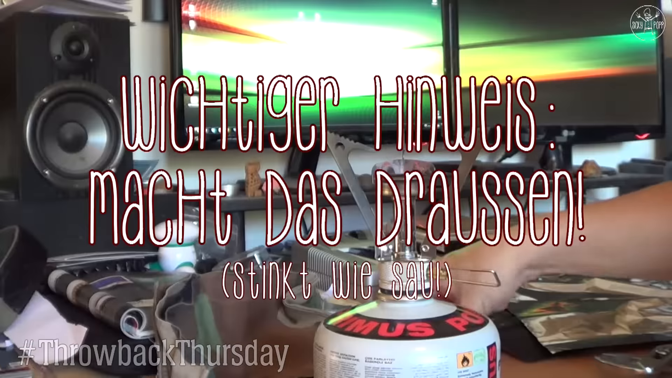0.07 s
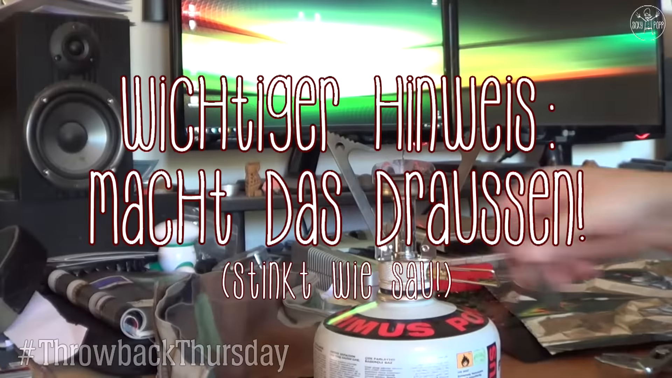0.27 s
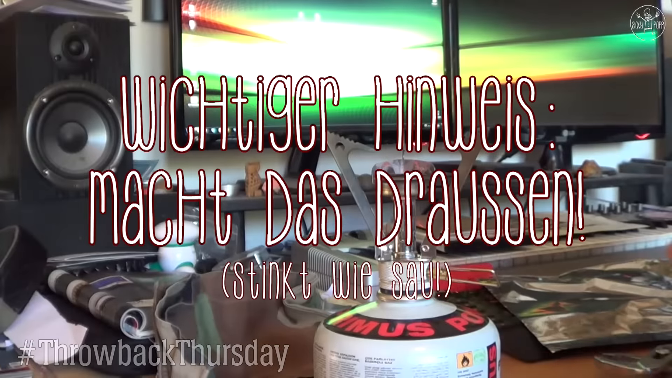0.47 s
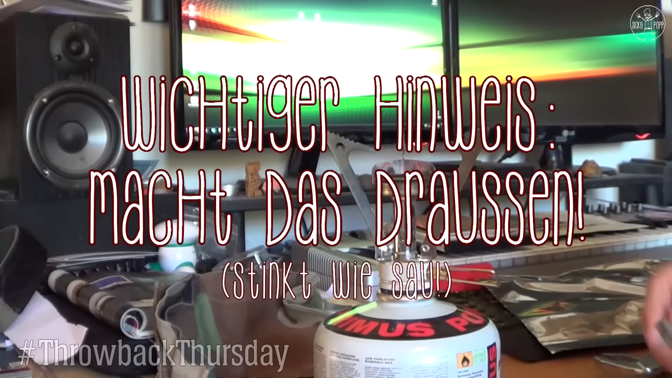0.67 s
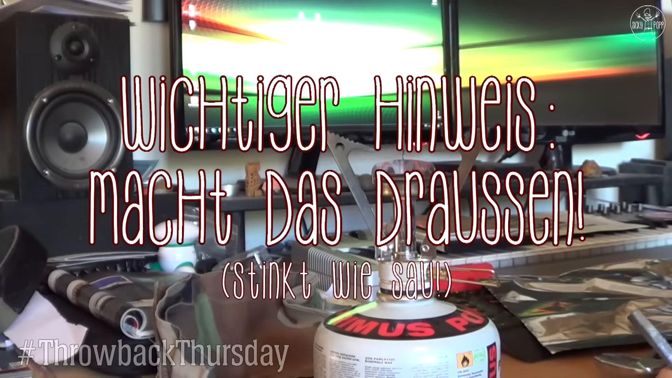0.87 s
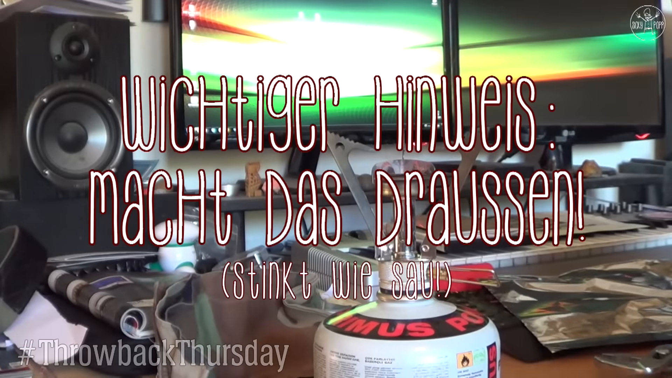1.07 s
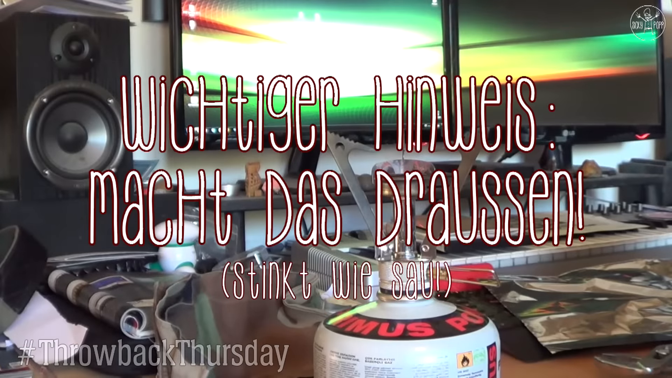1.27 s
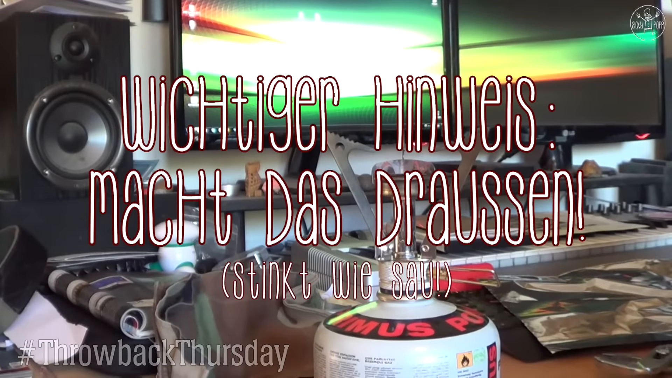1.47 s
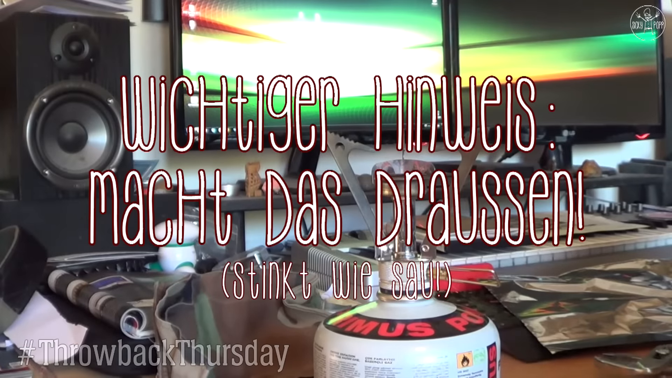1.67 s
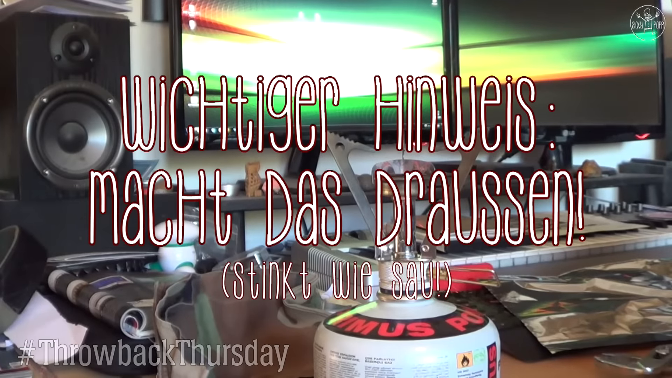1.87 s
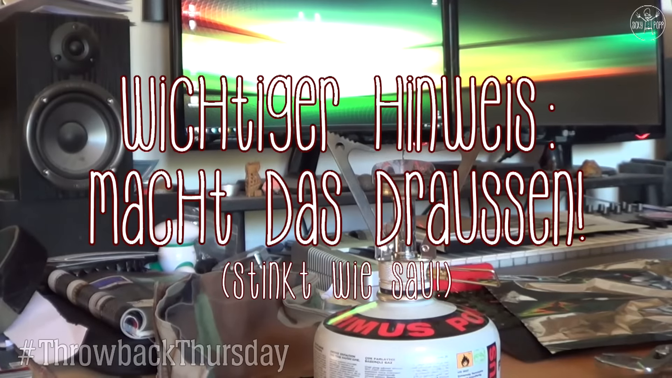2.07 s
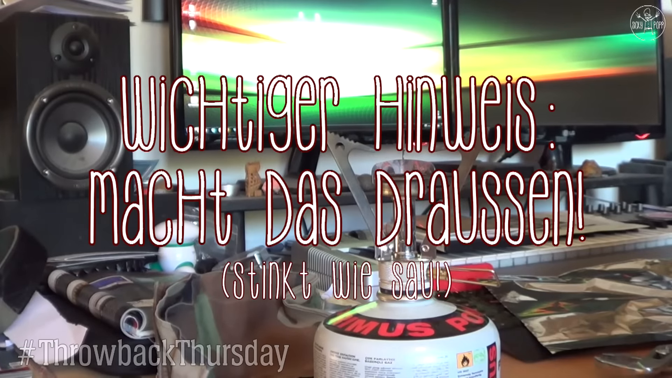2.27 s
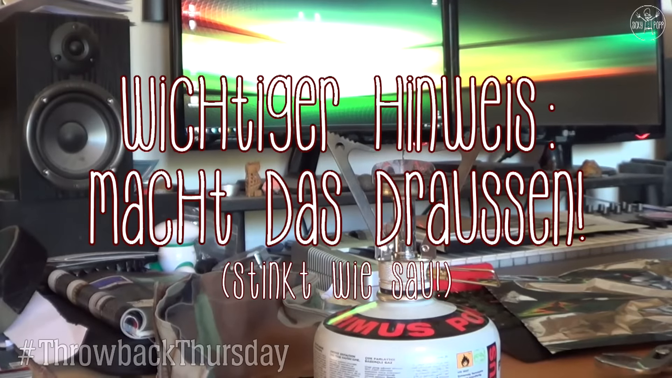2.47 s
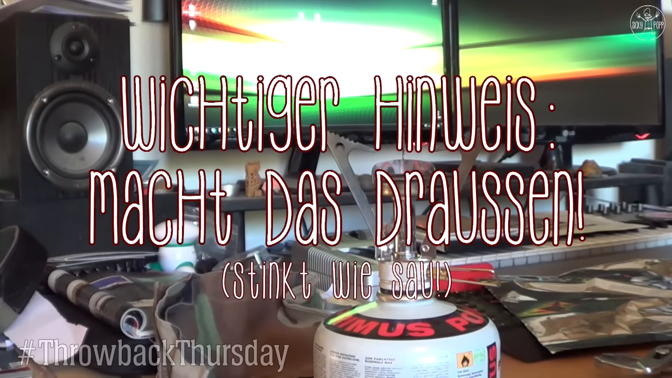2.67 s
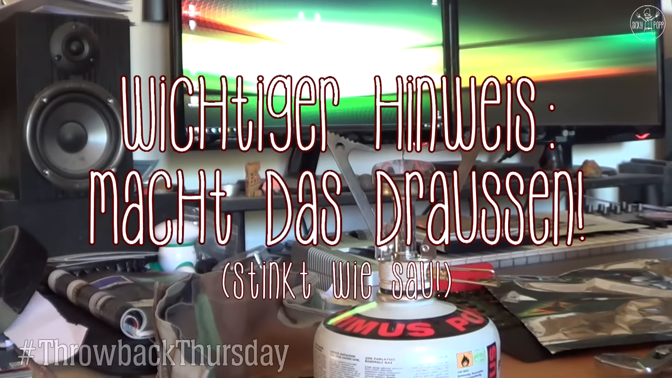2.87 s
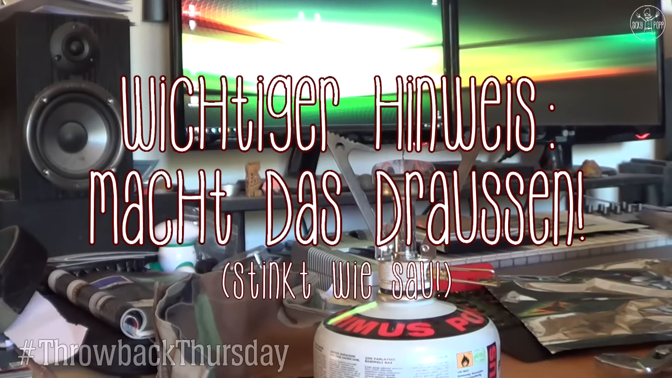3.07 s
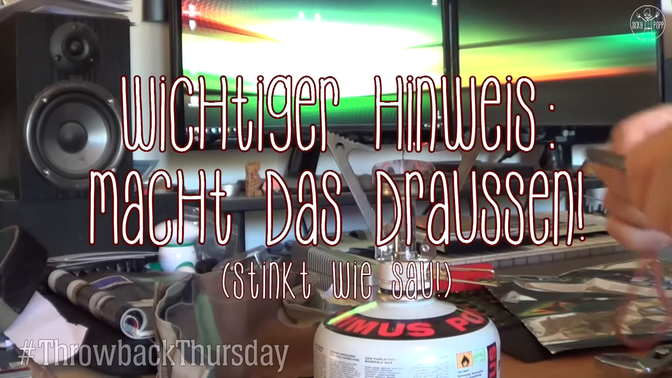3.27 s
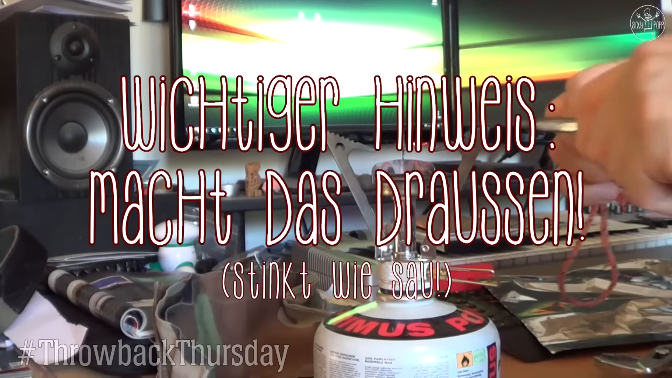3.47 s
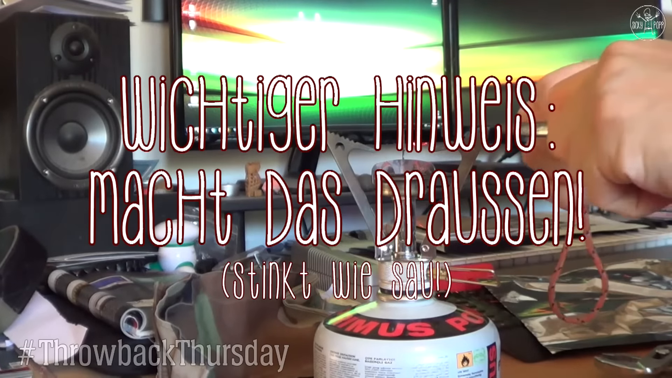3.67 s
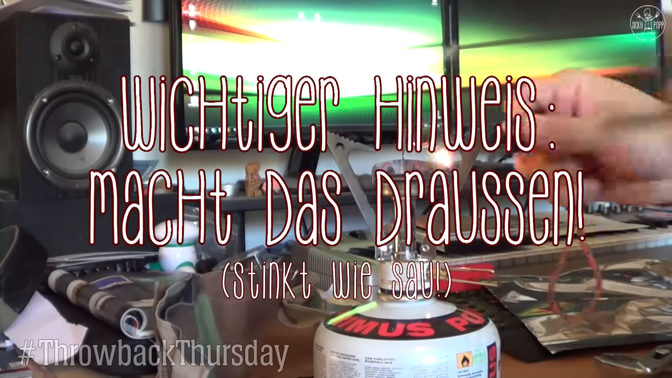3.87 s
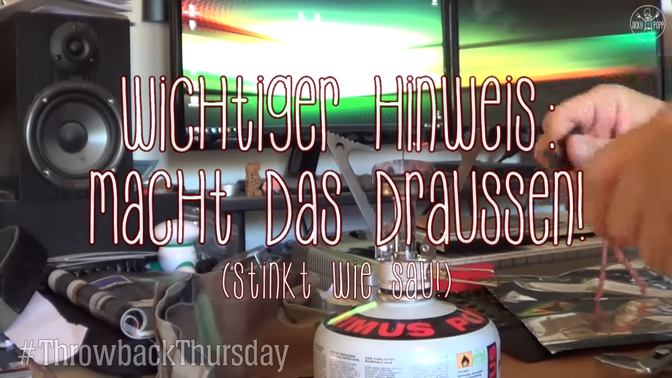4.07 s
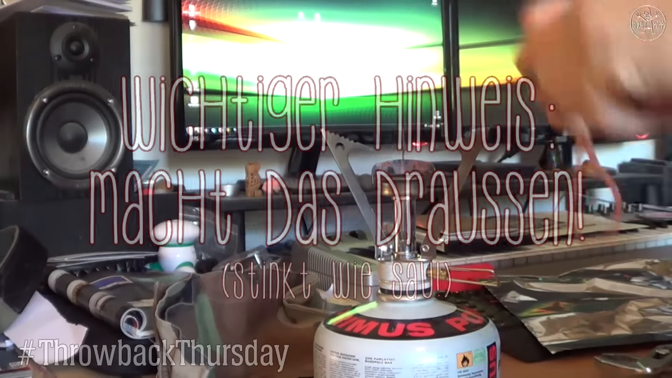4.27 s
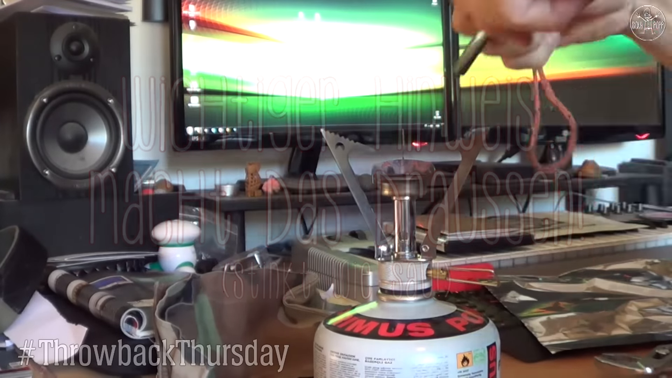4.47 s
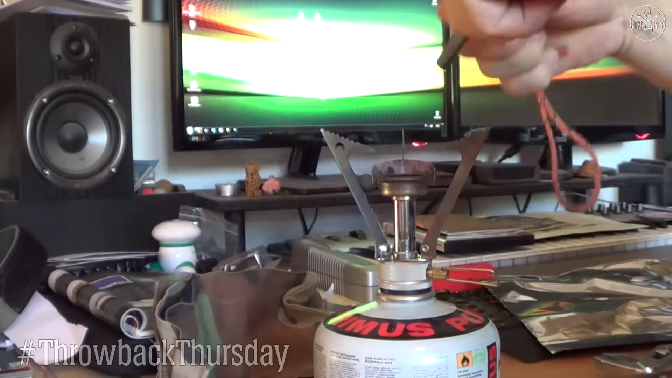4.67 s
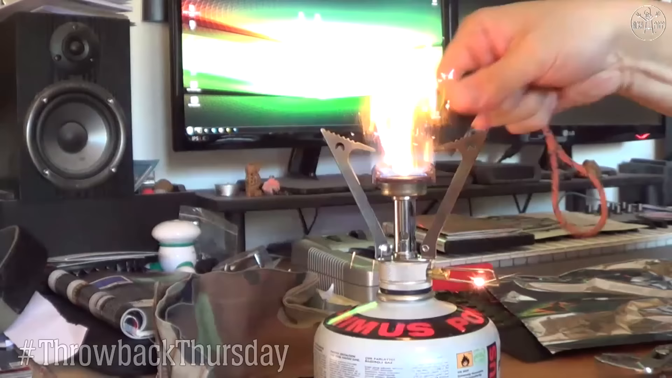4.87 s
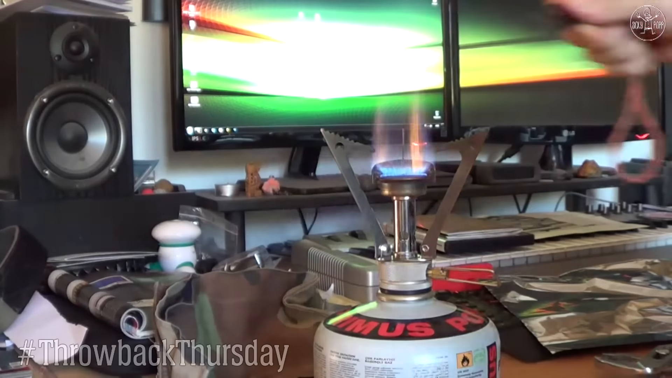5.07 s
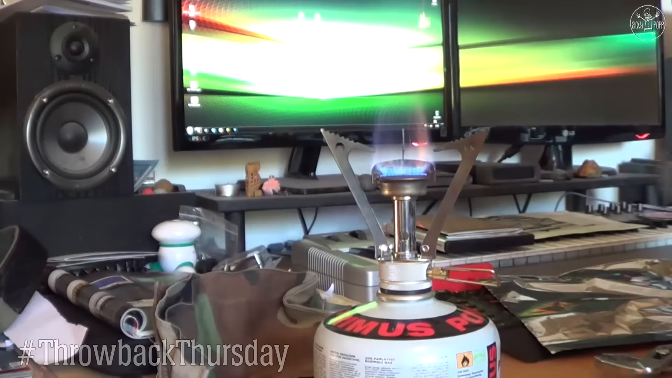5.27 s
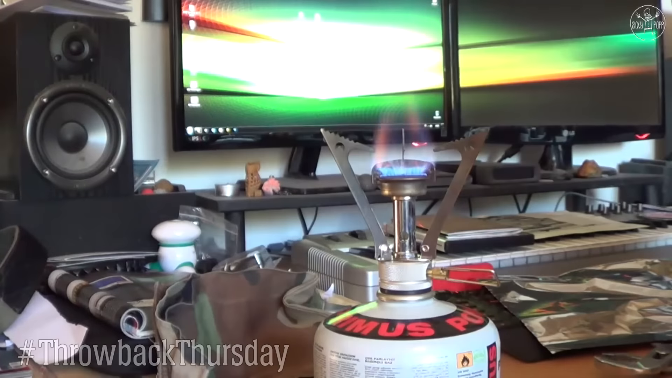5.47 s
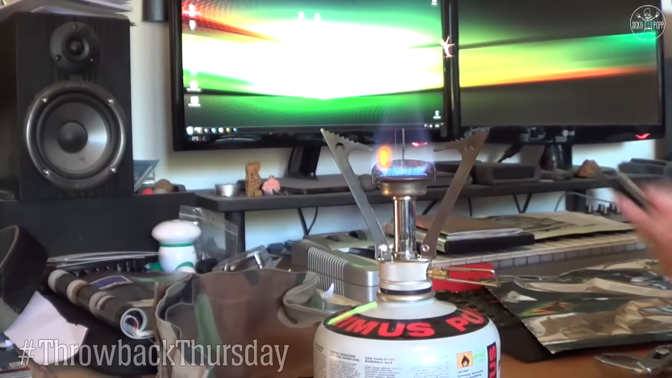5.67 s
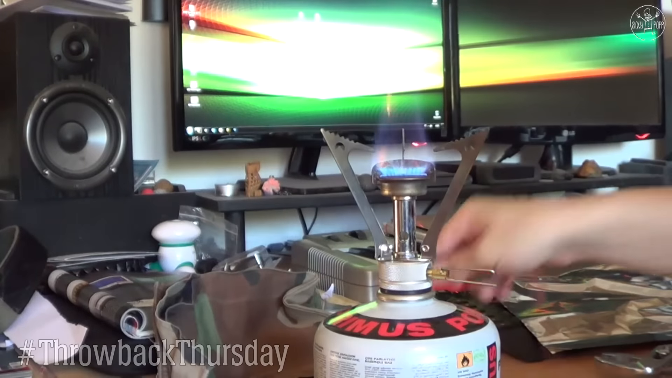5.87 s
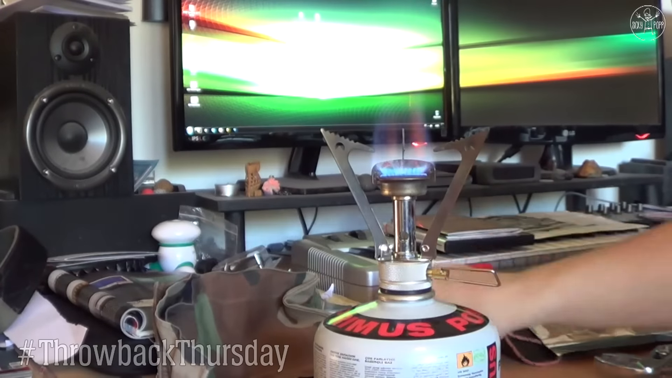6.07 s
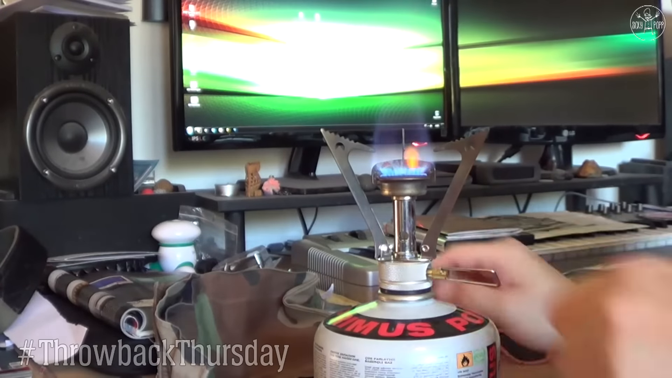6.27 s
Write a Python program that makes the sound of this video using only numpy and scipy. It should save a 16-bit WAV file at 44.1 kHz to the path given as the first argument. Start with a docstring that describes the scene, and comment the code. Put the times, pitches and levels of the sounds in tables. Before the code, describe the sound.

Metal clinks and rings, a fire steel taps and rasps, and a hissing gas burner catches and burns with a steady roar indoors.

```python
"""A desk in a small room, with a camping gas stove on it. Unlit gas hisses from the open valve while a
steel piece is dragged, clinked and set down: friction and impacts excite its modes, and a grip damps them.
A fire steel is tapped and scraped, twice hard; the second shower of sparks lights the gas with a soft
whump. The flame roars on, and a hand rummages among the steel again. A limiter holds the peaks down."""
import sys
import numpy as np
from scipy import signal
from scipy.fft import rfft, irfft, next_fast_len
from scipy.io import wavfile
from scipy.ndimage import uniform_filter1d, minimum_filter1d, map_coordinates

SR = 44100
rng = np.random.default_rng(int(sys.argv[2]) if len(sys.argv) > 2 else 0)


def int16_out(signal):
    """Quantize to a 16-bit WAV file."""
    q = np.round(np.clip(np.atleast_2d(signal).T, -1, 1) * 32767)
    wavfile.write(sys.argv[1], SR, q.astype(np.int16))


N = 277874

# clinks and knocks of the steel piece, and one dull tap on the desk: start_s, click_db, knock_db, ring_db
CONTACTS = [(.016, -8, -31.5, -46), (.133, -29, -36.5, -31.5), (0.289, -7.5, -29, -35),
            (.31, -16, -38, -28), (.322, -13.5, -29, -20.5), (.465, -9.5, -30.5, -11), (.471, 6, -25, -14),
            (.488, -22, -29, -4.5), (.554, 3, -28, -18), (.612, -14, -34, -13), (.645, -3, -27.5, -22),
            (.676, -2, -27, -40), (.878, -30, -37.5, -70), (1.55, -17, -20.5, -32),
            (1.605, -16, -35.5, -29), (1.616, -7, -38, -19.5), (1.842, -2.5, -17, -17),
            (1.874, -6, -30, -20), (1.898, -9, -40, -19.5), (6.072, -10, -19, -19),
            (6.114, -20, -13.5, -31), (6.147, -28, -28, -9.5), (6.176, -10, -49, -8.5),
            (6.213, -5, -41, -14), (6.249, -3, -33, -16.5)]


def amp(db):
    """Amplitude ratio of a level in decibels."""
    return 10 ** (np.asarray(db) / 20)


def unit(x):
    """Normalisation to an rms of 1."""
    return x / np.sqrt(np.mean(x ** 2) + 1e-20)


def along(points, hz):
    """Interpolation of (frequency_hz, value) points on a logarithmic frequency axis."""
    knots_hz, values = np.transpose(points)
    return np.interp(np.log(hz + 1), np.log(knots_hz + 1), values)


def curve(rows):
    """Linear interpolation of (time_s, value) rows at every sample."""
    return np.interp(np.arange(N) / SR, *np.transpose(rows))


def wobble(rate_hz, size=N):
    """Smooth random modulation: a spline through Gaussian knots."""
    knots = rng.standard_normal(int(size * rate_hz / SR) + 4)
    return map_coordinates(knots, [np.arange(size) * rate_hz / SR])


def add(track, start_s, sound):
    """Superposition of a sound on the track."""
    part = track[max(round(start_s * SR), 0):][:len(sound)]
    part += sound[:len(part)]


def filtered(x, response):
    """Linear filtering: the spectrum is multiplied by a frequency response."""
    size = next_fast_len(x.shape[-1] + 8192)
    return irfft(rfft(x, size) * response(np.fft.rfftfreq(size, 1 / SR)), size)[..., :x.shape[-1]]


def body(force, spectrum, size=4096):
    """A body colours a force as a causal, minimum-phase filter of unit energy."""
    magnitude = amp(along(spectrum, np.fft.rfftfreq(size, 1 / SR)))
    cepstrum = irfft(np.log(magnitude))
    cepstrum[1:size // 2] *= 2
    cepstrum[size // 2 + 1:] = 0
    response = irfft(np.exp(rfft(cepstrum)))
    return signal.fftconvolve(force, response / np.linalg.norm(response))[:N]


def resonance(force, hz, width_hz):
    """A driven damped oscillator of unit energy: the narrower its band, the longer it rings."""
    response = np.exp((2j * hz - width_hz) * np.pi * np.arange(SR // 8) / SR).imag
    return signal.fftconvolve(force, response / np.linalg.norm(response))[:N]


def impact(t60_s, chatter_db, chatter_t60_s):
    """A contact force as exponentially decaying noise: a short crack over weaker, longer chatter."""
    t = np.arange(SR // 4) / SR
    return rng.standard_normal(len(t)) * (amp(-60 * t / t60_s) + amp(chatter_db - 60 * t / chatter_t60_s))


def stick_slip(rate_hz, spread_db, decay_s):
    """Stick-slip friction of rms 1: tiny bursts of uneven size at random times."""
    slips = (rng.random(N) < rate_hz / SR) * amp(spread_db * np.clip(rng.standard_normal(N), -2, 2))
    envelope = signal.lfilter([1], [1, -np.exp(-1 / (decay_s * SR))], slips)
    return unit(envelope * rng.standard_normal(N))


def diffuse(pair):
    """A diffuse field is partly coherent at two points; two independent signals are mixed to match."""
    # likeness of left and right: frequency_hz, coherence
    coherence = [(60, .94), (130, .88), (300, .76), (700, .52), (1400, .52), (3000, .68), (7000, .75),
                 (15000, .93)]
    angle = lambda hz: np.arccos(np.clip(along(coherence, hz), -1, 1)) / 2
    mid, side = filtered(pair, lambda hz: np.array([np.cos(angle(hz)), np.sin(angle(hz))]))
    return np.array([mid + side, mid - side])


def diffuse_noise(spectrum):
    """Stationary stereo noise of rms 1 with the given spectral shape."""
    white = diffuse(rng.standard_normal((2, N)))
    return unit(filtered(white, lambda hz: amp(along(spectrum, hz))))


def room(x, wet_db):
    """Reverberation: diffuse reflections follow the direct sound, each band dying at its own rate."""
    # reverberation time: frequency_hz, t60_s
    decay_times = [(100, 0.29), (500, 0.31), (2000, 0.28), (7000, 0.25), (15000, 0.15)]
    hz, t, bands = signal.stft(rng.standard_normal((2, SR // 2)), SR, nperseg=256)
    decay = amp(-60 * t / along(decay_times, hz)[:, None])
    tail = diffuse(signal.istft(bands * decay, SR, nperseg=256)[1])
    tail *= 1 - np.exp(-np.arange(tail.shape[1]) / SR / 0.00092)  # reflections build up
    reflections = signal.fftconvolve(np.atleast_2d(x), tail / np.linalg.norm(tail[0]), axes=1)
    return x + amp(wet_db) * reflections[:, :N]


def standing_waves(hz):
    """Frequency response of the room's modes, which ring on in the bass."""
    # room modes: centre_hz, width_hz
    modes = [(87, 10), (119, 10), (214, 14), (270, 14), (330, 20), (515, 26), (671, 26)]
    peaks = sum(1j * hz * width / (centre ** 2 - hz ** 2 + 1j * hz * width) for centre, width in modes)
    return 1 + 0.7 * peaks


def direction(hz):
    """Level and phase differences between the channels place the sound a little to the right."""
    # left minus right: frequency_hz, level_db
    level_difference = [(100, 0.1), (200, 0), (380, -1.5), (700, -5), (1300, -5.5), (2400, -4.5),
                        (4400, -2.5), (8000, -1.4), (15000, 0.2)]
    # lead of left over right: frequency_hz, phase_rad
    phase_difference = [(130, 0.07), (550, -0.66), (1700, -.25), (3800, .2), (8000, .2), (12000, -0.1)]
    left = amp(along(level_difference, hz) / 2) * np.exp(1j * along(phase_difference, hz) / 2)
    return np.array([left, 1 / left])


def room_tone():
    """The noise floor: faint low noise whose level drifts slightly."""
    # ambient spectrum: frequency_hz, density_db
    spectrum = [(20, -22), (35, -4), (60, -16), (110, -11), (170, -5.5), (330, -8.5), (550, -10.5),
                (1500, -17), (2500, -32)]
    return amp(-54 + 0.67 * wobble(2.9)) * diffuse_noise(spectrum)


def rustle(peak_s=2.675, width_s=0.22):
    """Soft low noise swells and fades under a Gaussian envelope."""
    # rustle spectrum: frequency_hz, density_db
    spectrum = [(100, -33), (300, -0.5), (550, -5.5), (1000, -7), (2500, -35)]
    from_peak = (np.arange(N) / SR - peak_s) / width_s
    return amp(-54) * np.exp(-from_peak ** 2 / 2) * diffuse_noise(spectrum)


def bumps(rest_s=0.679):
    """Low pressure pulses, and the free vibration of hollow sheet metal as the steel comes to rest."""
    # pulses, the last two the gas igniting: start_s, level_db, pitch_hz, length_s
    pulses = [(0.872, -35, 228, 0.0075), (4.834, -32.5, 82.5, 0.019), (4.838, -25.5, 169, 0.0083)]
    # sheet metal modes: pitch_hz, level_db, t60_s
    modes = [(900, 1.5, 0.17), (1560, -14, 0.28), (3080, 5.5, 0.027), (3380, -8, 0.17)]
    track, t = np.zeros(N), np.arange(SR // 2) / SR
    for start_s, db, hz, length_s in pulses:
        age = 2 * t / length_s
        envelope = amp(db) * age * np.exp(1 - age)
        add(track, start_s, envelope * np.sin(2 * np.pi * hz * t + wobble(hz / 2, size=len(t))))
    hollow_ring = sum(amp(db - 24.5 - 60 * t / t60) * np.sin(2 * np.pi * hz * t) for hz, db, t60 in modes)
    add(track, rest_s, hollow_ring)
    return room(track, wet_db=-2)


def sliding_force(attack_s=0.0025, ease_db_per_s=28, release_db_per_s=340):
    """Envelope of the sliding friction: each shove bites at once, eases off, then stops."""
    # shoves of the steel over the desk: start_s, length_s, level_db
    shoves = [(0, 0.014, -19), (0.133, .16, -35), (0.305, 0.018, -28.5), (0.483, 0.23, -28.5),
              (6.102, 0.17, -15.5)]
    t, force = np.arange(N) / SR, np.zeros(N)
    for start_s, length_s, db in shoves:
        age = np.maximum(t - start_s, 0)
        eased_db = ease_db_per_s * age + release_db_per_s * np.maximum(age - length_s, 0)
        force += amp(db - eased_db) * (1 - np.exp(-age / attack_s))
    return force


def steel_grip(grasp_s):
    """Contact damping by fingers or desk, from 0 (hanging free) to 1 (held)."""
    # spans in which the steel hangs free: start_s, end_s
    lifts = [(.31, 0.68), (1.57, 1.919), (6.185, 6.225)]
    t = np.arange(N) / SR
    return 1 - sum(np.tanh((t - start) / grasp_s) - np.tanh((t - end) / grasp_s) for start, end in lifts) / 2


def contact_noise():
    """Impact and friction: the steel clicks, knocks and scrapes on the desk, which also takes a dull tap."""
    # spectra of the click, the desk's knock and the scrape: frequency_hz, density_db
    click_spectrum = [(80, -28), (900, -3.5), (2200, 5), (4000, 3.5), (5000, -3.5), (7000, -4), (10000, -8),
                      (13000, -25), (16000, -56)]
    knock_spectrum = [(35, -37), (120, -18.5), (230, -5), (380, -2), (1000, -1), (1700, -10.5), (3500, -16),
                      (8000, -70)]
    drag_spectrum = [(50, -44), (250, -10), (600, -5.5), (1000, 1), (1800, 2.5), (2800, -5), (4500, -13.5),
                     (7000, -10), (10000, -16), (13000, -23), (16000, -30)]
    clicks, knocks = np.zeros((2, N))
    for start_s, click_db, knock_db, _ in CONTACTS:
        add(clicks, start_s, amp(click_db - 4) * impact(0.0094, chatter_db=-27.5, chatter_t60_s=0.073))
        add(knocks, start_s, amp(knock_db - 2) * impact(0.05, chatter_db=-13.5, chatter_t60_s=0.11))
    friction = sliding_force() * stick_slip(rate_hz=1100, spread_db=-1.5, decay_s=0.00082)
    surface = body(clicks, click_spectrum) + body(friction, drag_spectrum)
    return room(surface, wet_db=-7) + room(body(knocks, knock_spectrum), wet_db=1)


def steel_ring(damping_db_per_s=243, grasp_s=0.012, held_low_db=-12, bending_below_hz=5000):
    """Modal vibration: each clink restarts the modes, a grip damps them, and turning makes them waver."""
    # low and high modes of the steel: pitch_hz, level_db, t60_s
    low_modes = [(1136, -14, .4), (3178, -8, .9), (4748, -19, 1.0), (6222, 0, 3.6)]
    high_modes = [(8668, -2, 1.9), (9510, -1, .7), (11645, -6, .3), (11715, -7, .22), (14735, -15, .25),
                  (15530, -17, .18)]
    ring, grip, force = np.zeros((2, N)), steel_grip(grasp_s), sliding_force()
    damped_db = damping_db_per_s * np.cumsum(grip) / SR
    pressed = np.tanh(force / amp(-29))
    jostle = 0.13 + 0.8 * pressed  # scraping disturbs the modes' phase and strength
    ageing = 1 - 0.9 * np.tanh(force / amp(-47))  # it also feeds them, slowing their decay
    ends = [row[0] for row in CONTACTS[1:]] + [N / SR]
    for (start_s, _, _, ring_db), end_s in zip(CONTACTS, ends):
        span = slice(round(start_s * SR), round(start_s * SR) + SR // 3)
        held_db, age = damped_db[span], np.cumsum(ageing[span]) / SR
        t = np.arange(len(age)) / SR
        stopped_db = 60 * np.maximum(t - (end_s - start_s), 0) / 0.0059  # the next contact ends this ring
        envelope = amp(held_db[0] - held_db - stopped_db) * (1 - np.exp(-t / 0.00041))
        gripped_db = held_low_db * grip[round((start_s + grasp_s) * SR)]
        for modes, blow_db in (low_modes, ring_db - 6 + gripped_db), (high_modes, ring_db - 7):
            for hz, db, t60 in modes:
                waver, chatter, slip = (wobble(rate_hz, size=len(t)) for rate_hz in (35, 130, 150))
                struck_db = blow_db + db + 1.4 * rng.normal()  # each spot favours other modes
                level_db = struck_db + 2.8 * waver + 4 * jostle[span] * chatter - 60 * age / t60
                level_db -= 9 * pressed[span] * (hz < bending_below_hz)  # pressing mutes bending modes
                phase = 2 * np.pi * hz * (1 + 0.001 * rng.normal()) * t + jostle[span] * slip
                mode = envelope * amp(level_db) * np.sin(phase)
                lean = amp(-1 + 1.1 * rng.normal())  # each mode beams its own way
                add(ring[0], start_s, mode * lean)
                add(ring[1], start_s, mode / lean)
    return room(ring, wet_db=-8)


def stroke_gate(start_s, end_s, rise_s=0.011, fall_s=0.0083):
    """Envelope of a stroke, with smooth onset and release."""
    t = np.arange(N) / SR
    return (1 + np.tanh(2 * (t - start_s) / rise_s - 1)) * (1 - np.tanh((t - end_s) / fall_s)) / 4


def fire_steel(rebound_s=0.0202, rebound_loss_db=1.5, bear_down_db=5, flare_share=0.44):
    """Impact and friction: a scraper taps and rasps a rod; late in a hard stroke, sparks flare and puff."""
    # taps of scraper on rod: start_s, tick_db, body_db, rebound_count
    tap_times = [(3.2737, -22.5, -43, 1), (3.4699, -18.5, -34.5, 1), (3.9818, -23, -58, 0),
                 (4.2646, -9.5, -36.5, 0), (4.346, -12, -31.5, 0), (4.5027, -12, -24, 2),
                 (4.797, -2, -28.5, 0), (4.8537, -11, -39, 0), (4.936, -10.5, -41, 0),
                 (5.435, -11.5, -47, 0)]
    # blows that ring the scraper: start_s, level_db
    tink_times = [(5.434, -24.5), (5.446, -26)]
    # scraper resonances: pitch_hz, width_hz, level_db
    scraper_modes = [(9510, 190, 0.85), (11640, 73, -2.1)]
    # strokes along the rod: start_s, length_s, level_db
    strokes = [(3.274, 0.027, -43.5), (3.747, 0.068, -21), (4.334, 0.012, -36), (4.778, 0.059, -23),
               (5.572, 0.031, -34), (5.95, .046, -33.5)]
    # spectra of a tap's tick and body, the rasp and the sparks' puff: frequency_hz, density_db
    tick_spectrum = [(500, -25), (3000, -17), (5000, -1.5), (7000, 4.5), (9500, -2), (13000, -8),
                     (16000, -19)]
    tap_spectrum = [(150, -40), (700, -2), (1500, 5), (2700, 10), (4000, 5.5), (7000, 0), (14000, -31)]
    rasp_spectrum = [(710, -90), (1200, -20.5), (2750, -3), (3420, -9.5), (4770, -8), (6390, 1),
                     (8270, -1.5), (9120, 3), (13700, -9), (15800, -22)]
    puff_spectrum = [(70, -15), (200, 3), (700, 7), (1300, 3.5), (3000, -1), (8000, -56)]
    ticks, taps, tinks, rasp, puff = np.zeros((5, N))
    for start_s, tick_db, body_db, rebounds in tap_times:
        for k in range(round(rebounds) + 1):
            at_s, loss_db = start_s + k * rebound_s, k * rebound_loss_db
            add(ticks, at_s, amp(tick_db - loss_db - 12) * impact(0.015, chatter_db=-25, chatter_t60_s=0.04))
            add(taps, at_s, amp(body_db - loss_db + 2) * impact(0.025, chatter_db=-27, chatter_t60_s=0.04))
    for start_s, db in tink_times:
        add(tinks, start_s, amp(db + 8.5) * impact(0.015, chatter_db=-22, chatter_t60_s=0.072))
    t = np.arange(N) / SR
    for start_s, length_s, db in strokes:
        flare_s, end_s = start_s + flare_share * length_s, start_s + length_s
        progress = np.clip((t - start_s) / length_s, 0, 1)
        rasp += amp(db + bear_down_db * (progress - 0.5)) * stroke_gate(start_s, end_s)
        puff += amp(9 + 2 * db) * stroke_gate(flare_s, end_s)  # grows as the square of the rasp
    grit = stick_slip(rate_hz=2500, spread_db=3, decay_s=0.0005)
    scrape = body(rasp * grit, rasp_spectrum) + body(puff * rng.standard_normal(N), puff_spectrum)
    chime = sum(amp(db) * resonance(tinks, hz, width_hz) for hz, width_hz, db in scraper_modes)
    tapping = body(ticks, tick_spectrum) + body(taps, tap_spectrum)
    return room(scrape + chime, wet_db=-3) + room(tapping, wet_db=-5.5)


def burner():
    """Jet and combustion noise: gas hisses throughout; once lit, the flame adds a roar and a fine fizz."""
    # strength of the gas jet and of the flame: time_s, level_db
    gas_levels = [(0.8, -50), (1.65, -47.5), (4.7, -47.5)]
    flame_levels = [(4.795, -85), (4.815, -29.5), (6.3, -26.5)]
    # spectra of the jet and of the flame's roar and fizz: frequency_hz, density_db
    jet_spectrum = [(880, -61), (1500, -6), (1810, -9.5), (2200, -0.5), (3330, -2.5), (3900, -3),
                    (4350, 2.5), (4890, -1.5), (6320, -0.5), (8090, -10.5), (9850, -2), (11300, -6),
                    (13000, -16.5), (14600, -23), (15800, -11.5)]
    roar_spectrum = [(30, -48), (55, -28), (80, -23), (170, -4.5), (400, -7), (600, -3), (780, -3.5),
                     (1050, -14), (1500, -14), (1900, -30), (3000, -55)]
    fizz_spectrum = [(1060, -33), (1800, -11), (2200, 3), (2520, -5.5), (3080, -4.5), (3430, -15),
                     (4590, -12), (5170, -2.5), (6310, -11), (7500, -6), (8360, -16.5), (9580, -5.5),
                     (15800, -31)]
    jet = amp(curve(gas_levels) + 2.5 + 0.35 * wobble(6.22)) * diffuse_noise(jet_spectrum)
    flutter = amp(0.7 * wobble(60))
    roar = amp(-1.5) * diffuse_noise(roar_spectrum)
    fizz = amp(-11 + 2.1 * wobble(300)) * diffuse_noise(fizz_spectrum)
    return jet + amp(curve(flame_levels)) * flutter * (roar + fizz)


def scene():
    """The sources superpose, coloured by the room's modes and heard a little to the right."""
    air = room_tone()
    mix = contact_noise() + steel_ring() + bumps() + fire_steel() + burner() + rustle() + air
    return filtered(mix, lambda hz: standing_waves(hz) * direction(hz))


def record(dry, ceiling_db=-7.5, cutoff_hz=15900):
    """Peak limiting: the gain dips briefly around each peak, then a low-pass limits the band."""
    peaks = np.abs(dry).max(axis=0)
    needed_gain = np.minimum(1, amp(ceiling_db) / (peaks + 1e-9))
    gain = uniform_filter1d(minimum_filter1d(needed_gain, size=129), size=129)
    return filtered(dry * gain, lambda hz: hz < cutoff_hz)


dry = scene()
out = record(dry)
int16_out(out)
```